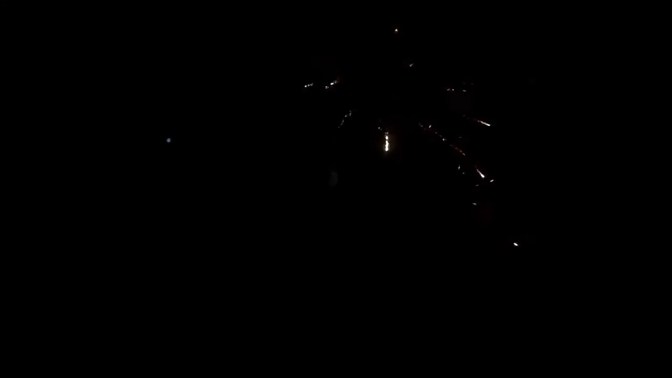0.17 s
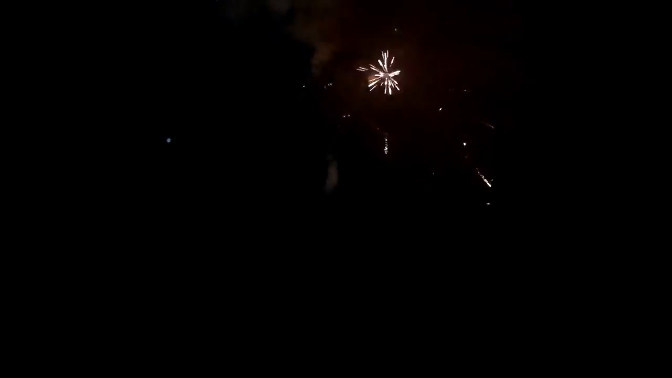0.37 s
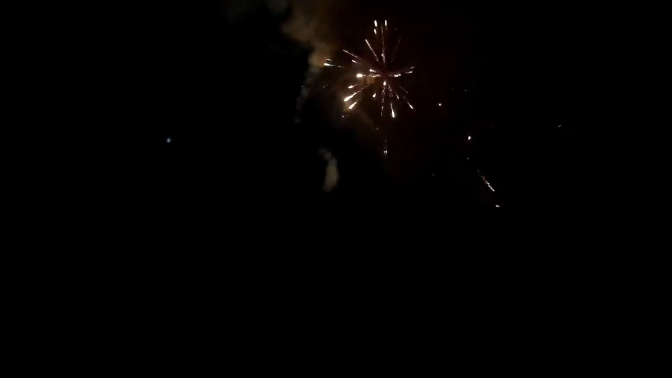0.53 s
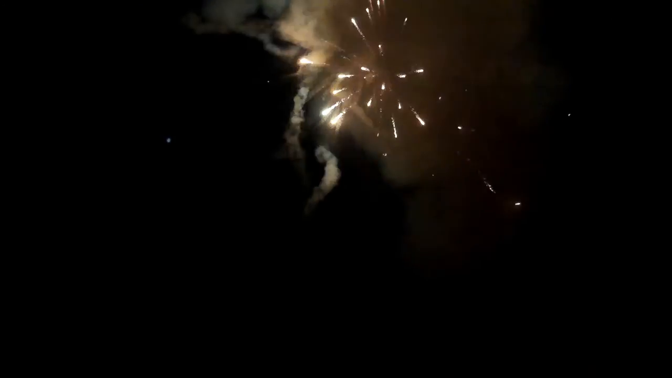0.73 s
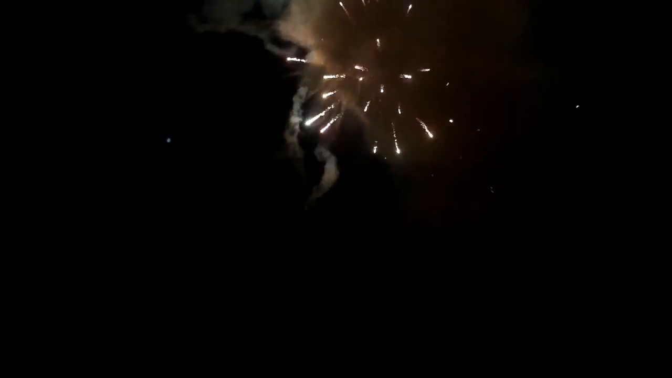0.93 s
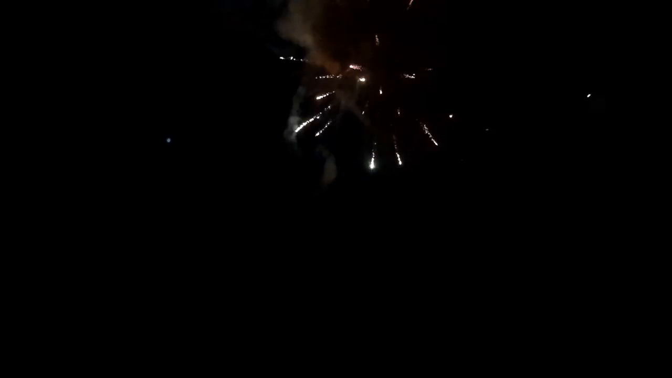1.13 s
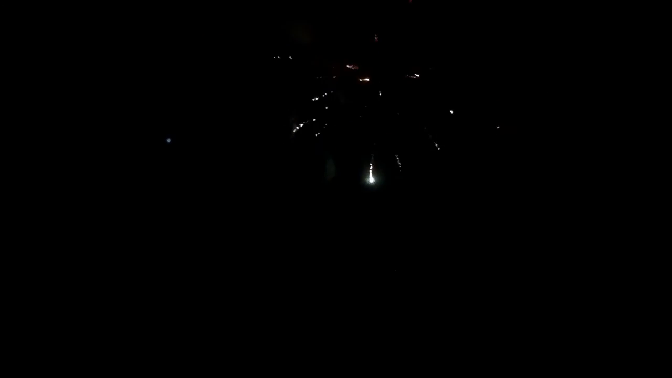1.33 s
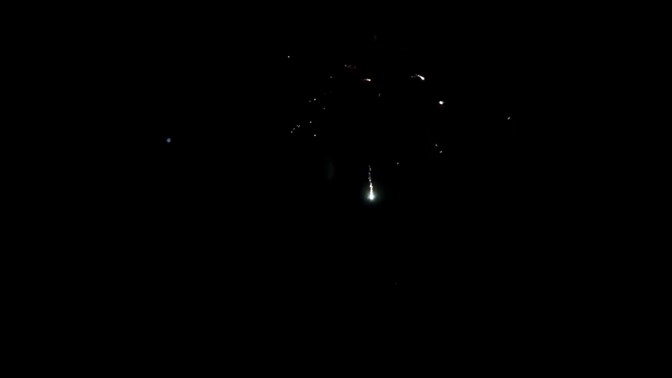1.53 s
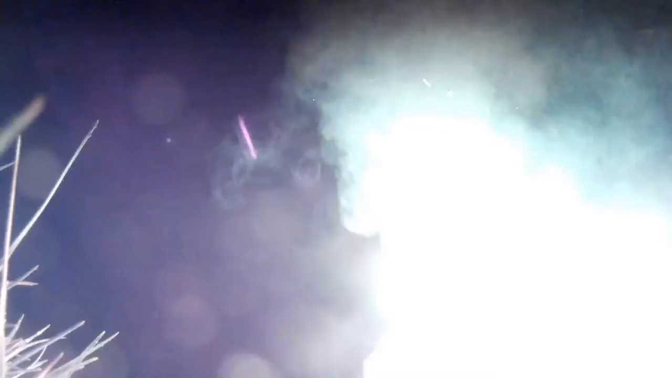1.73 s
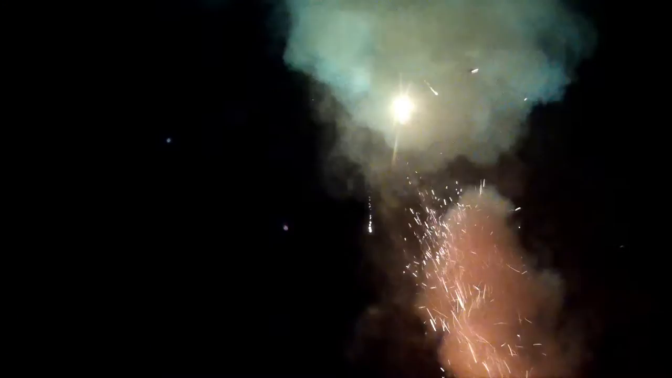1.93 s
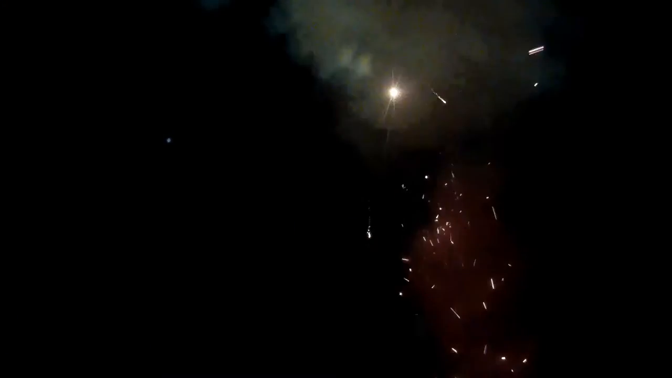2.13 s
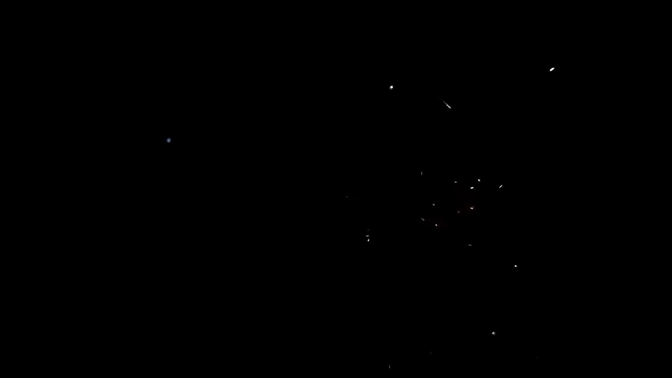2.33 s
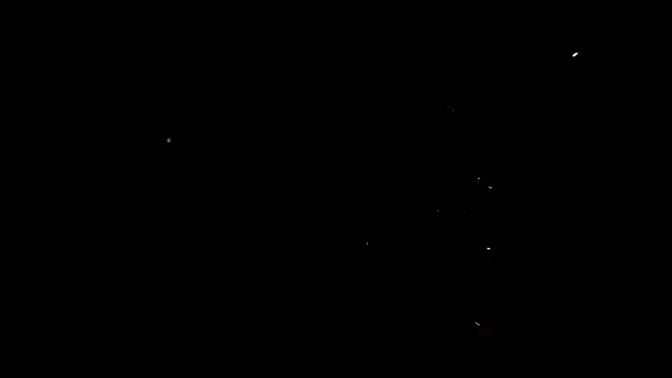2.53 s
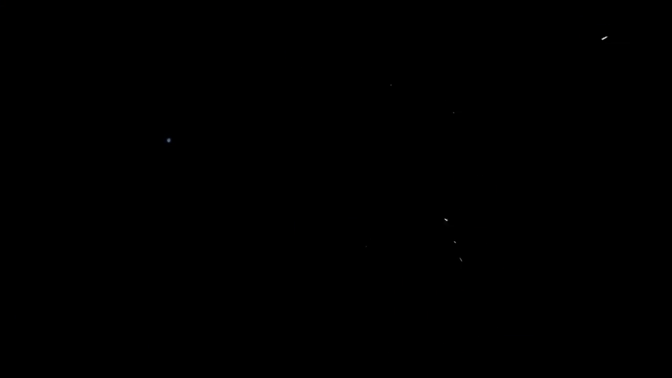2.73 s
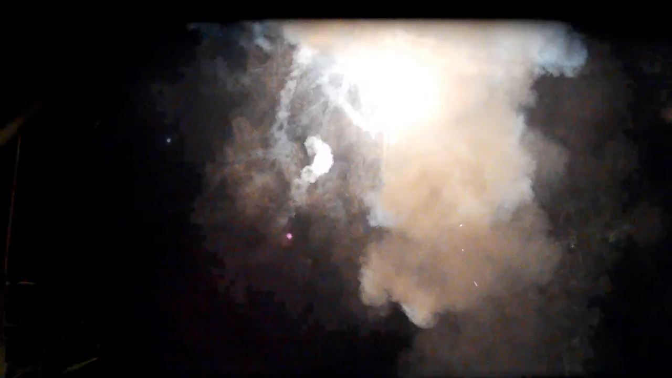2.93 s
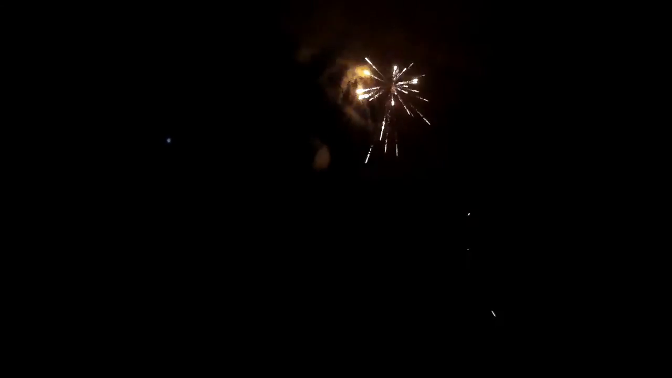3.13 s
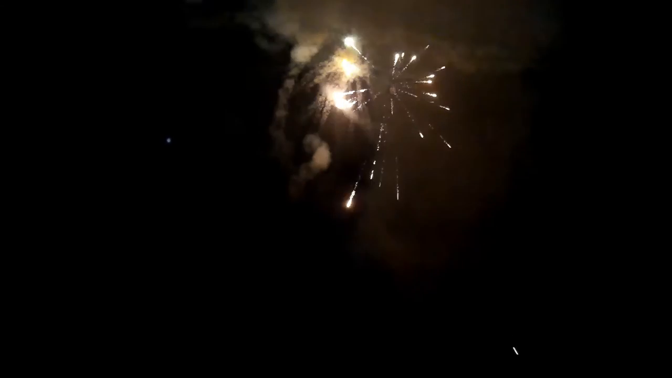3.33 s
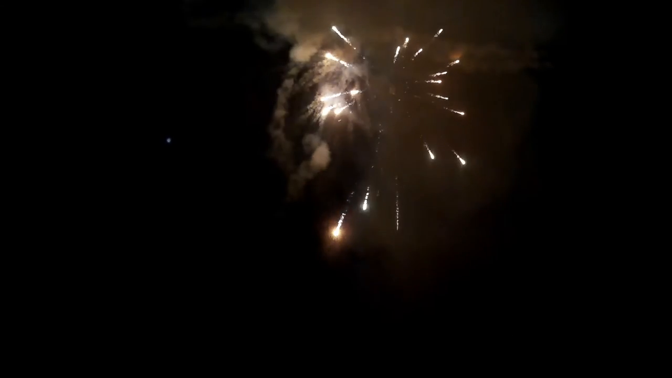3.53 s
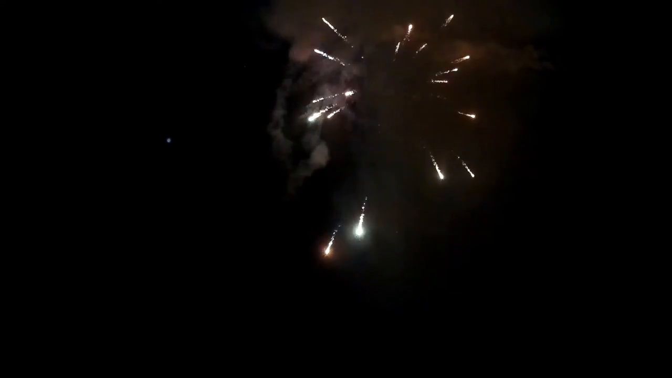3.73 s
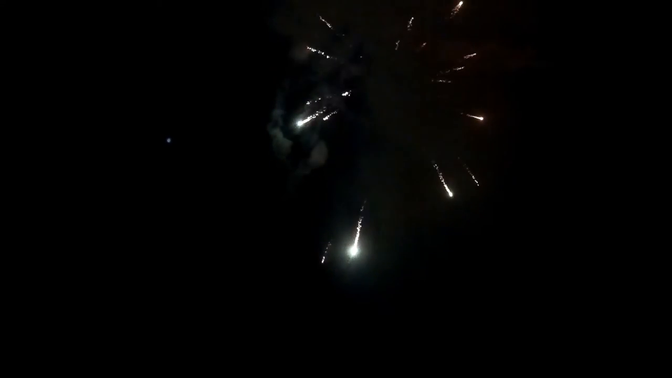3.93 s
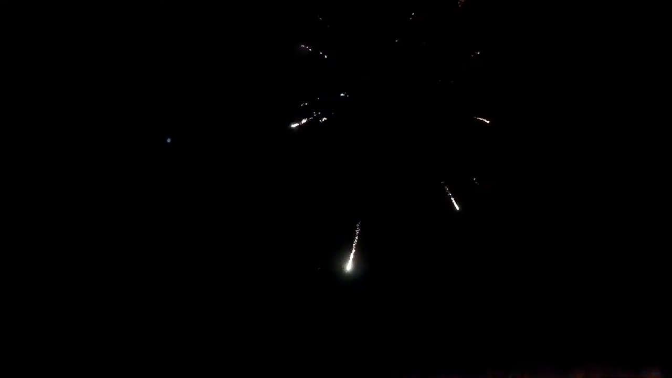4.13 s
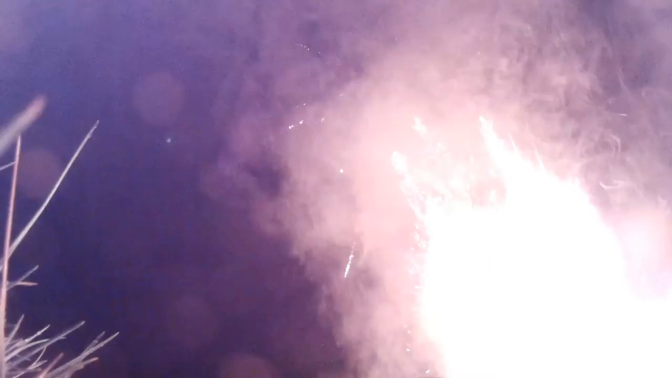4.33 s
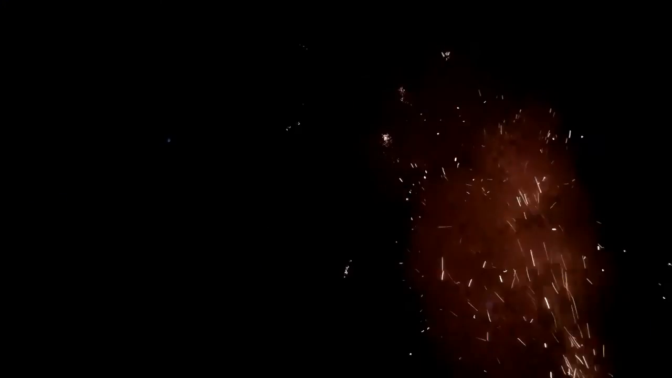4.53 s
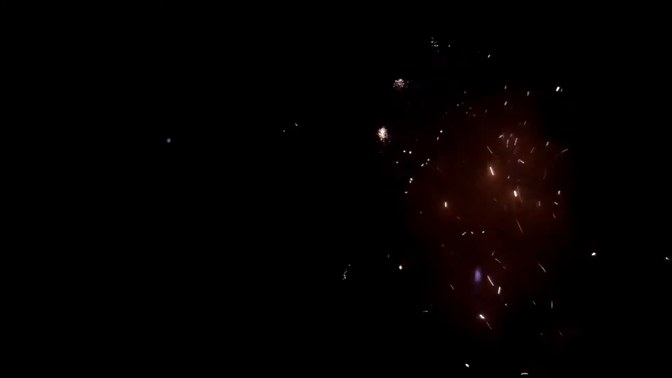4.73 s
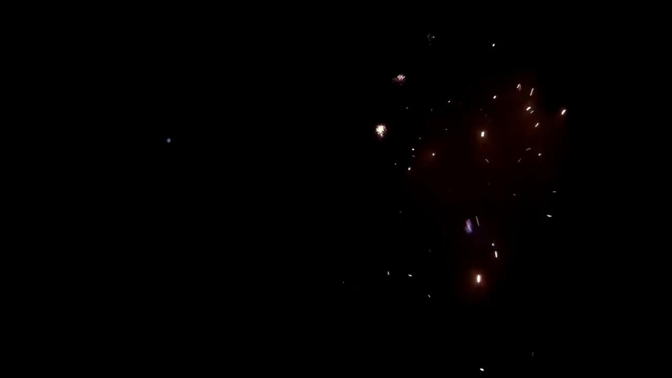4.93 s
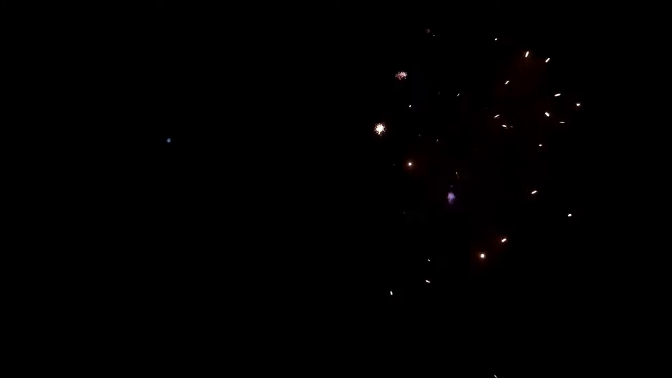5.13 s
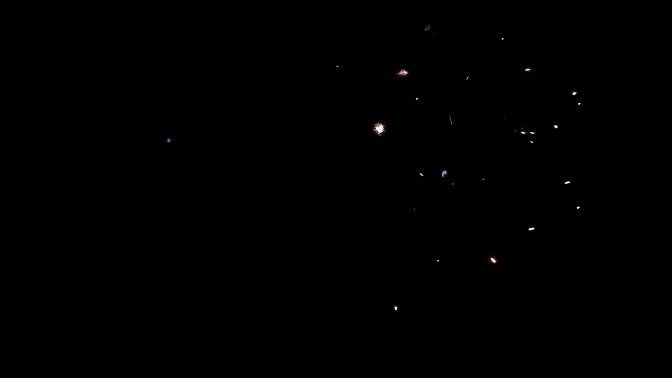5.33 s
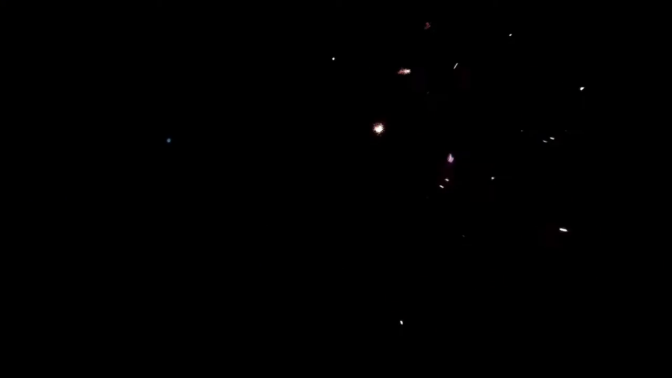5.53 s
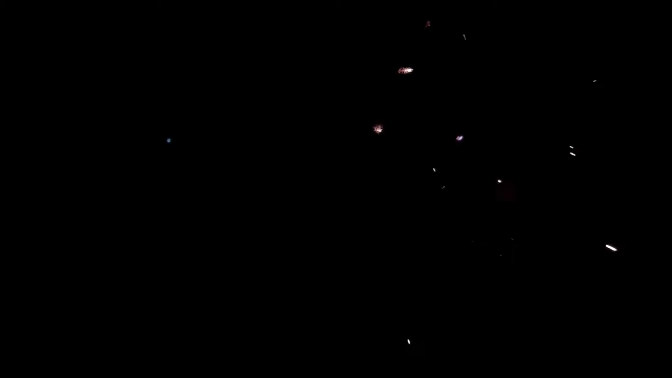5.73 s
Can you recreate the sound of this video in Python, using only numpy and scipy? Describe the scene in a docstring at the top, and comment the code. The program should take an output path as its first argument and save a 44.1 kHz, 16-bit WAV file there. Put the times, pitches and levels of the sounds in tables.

```python
"""Far thuds over a low rumble, then a firework shell cracks overhead: a garden at night.
Shells launch from tubes a few metres away and burst above. Each blast is a pressure jump and suction,
returned by hedges, trees and house walls. Spark fountains hiss briefly after the launches.
A small camera listens through a ringing housing and clips on the close bangs."""
import sys
import numpy as np
from scipy import signal
from scipy.fft import rfft, irfft
from scipy.io import wavfile
from scipy.ndimage import uniform_filter1d

SR = 44100
rng = np.random.default_rng(int(sys.argv[2]) if len(sys.argv) > 2 else 0)


def unload_wav(signal):
    """Save mono or channel-first audio to the path in sys.argv[1] as 16-bit WAV at rate SR, clipped to [-1, 1]."""
    wavfile.write(
        sys.argv[1],
        SR,
        np.round(np.clip(np.atleast_2d(signal).T, -1, 1) * 32767).astype(np.int16),
    )


N = 254898

KNOCK_HZ = 1066  # main housing resonance
BOUNCE_MS, BOUNCE_DB = 0.32, 2  # ground reflection, re direct blast
FRONT_DB = -1  # shock front bypassing the cover, re knock
SWELL_RISE_DB = 20  # climb per rise time
FAR_CYCLES, FAR_ROUGH = 2.1, 0.38
FAINT_PER_S, FAINT_MAX_DB, FAINT_HZ = 4, -51, 420
RUMBLE_DB, RUMBLE_FADE_DB_S, STEADY_DB = -51.5, 0.5, -54.5
HISS_DB, HISS_TOP_HZ = -67, 15400
CLIP, TOP_HZ = 0.705, 16900

# overhead bursts: (time [s], blast [dB], push [ms], knock [dB], ring and returns [dB], return lead [ms])
BURSTS = [(0.4142, 11.5, 0.13, -5.5, 1, 1), (3.0822, 12.5, 0.1, -9.5, -1.5, 3.51)]
# tube launches: (time [s], blast [dB], push [ms], knock [dB], metal ring [dB], scatter [dB],
# wall echo [dB], ground shake [dB], shake lead [ms])
LAUNCHES = [(1.7488, 16, 0.22, 6, -2, 1, 3, -17.5, 4.8), (1.8319, -4, 1, -38, -51, -10, -19, -50, 1.26),
            (4.1901, 12.5, 0.42, 5.5, -5, 0, -3, -20, 6.15),
            (4.2309, 13, .6, -1.5, -12.5, -10.5, -1.5, -18.5, 7),
            (4.2764, 14.5, 0.45, -15.5, -40.5, -14.5, -8.5, -21, 12)]
# foliage and ground returns:
# (delay [s], rise [s], hold [s], low [dB], treble [dB], low t60 [s], treble t60 [s])
BURST_SCATTER = [(0, .001, 0.00057, -30.5, -7, .3, 0.021), (.012, .01, .001, -49, -37, 3.5, 0.34),
                 (0.08, .03, 0.037, -37.5, -29, 0.37, 0.32),
                 (0.096, 0.0026, 0.004, -33, -23.5, 0.14, 0.057),
                 (0.235, 0.007, .06, -40.5, -39.5, 0.41, 0.46), (0.556, 0.21, 0.026, -49, -56.5, 0.42, .8)]
LAUNCH_SCATTER = [(0, .001, .001, -20.5, -21.5, 0.062, .06), (.02, .02, 0.00091, -40, -40.5, .45, .45),
                  (.33, .2, 0.0015, -59.5, -58, 2.2, 1.2)]
# wall echoes: (delay [s], level [dB], pitch [Hz], cycles)
BURST_ECHOES = [(0.0972, -14, 1490, 1.07), (.097, -36.5, 760, 7.7), (0.21, -32, 430, 2.86),
                (0.2379, -24.5, 616, 1.05), (0.2412, -22.5, 300, 3), (0.261, -32, 405, 1.44),
                (.56, -40, 700, 3.1)]
LAUNCH_ECHOES = [(0.159, -39, 462, 3.4), (0.283, -44.5, 437, 1.26), (.317, -38.5, 670, 1.56),
                 (.335, -32.5, 340, 3.5), (.39, -40, 380, 0.67)]
# modes of nearby metal, camera housing: (frequency [Hz], level [dB], t60 [s])
METAL_MODES = [(1614, -27, 0.4), (3760, -39.5, 0.27), (3880, -43.5, 0.092)]
HOUSING_MODES = [(KNOCK_HZ, 0, 0.035), (440, -7.5, 0.02), (1900, -10.5, 0.021), (2600, -10, 0.014),
                 (3700, -2, 0.0083)]
# low thump after each launch as the microphone recovers: (frequency [Hz], level re knock [dB], t60 [s])
LOW_THUMP_MODES = [(35, -15.5, 0.13), (90, -28.5, .15)]
# spark fountains; a crackling wash already fading as the scene opens, and a distant volley: # (time [s], rise
# [s], hold [s], low [dB], treble [dB], low t60 [s], treble t60 [s])
SPARKS = [(1.89, 0.036, .05, -48.5, -46, 0.68, .15), (4.29, .012, 0.026, -31.5, -30, 0.25, 0.3)]
CRACKLE_WASHES = [(.002, .001, 0.03, -54, -59, 0.84, .6), (2.46, .08, 0.013, -51, -60, 0.31, 0.44)]
# far bangs: (time [s], level [dB], pitch [Hz])
FAR_BANGS = [(0.0142, -35.5, 574), (.062, -41.5, 547), (.168, -48, 383), (0.349, -38, 830),
             (.951, -40, 3166), (1.091, -37.5, 950), (1.248, -46, 242), (1.403, -38, 2980),
             (1.411, -40.5, 236), (2.245, -49.5, 398), (2.489, -44, 299), (2.571, -46, 283),
             (2.986, -49.5, 455), (3.954, -47, 393), (4.031, -43, 918), (4.121, -46, 383),
             (4.475, -43, 272), (4.707, -50, 300), (5.019, -47, 159), (5.098, -51.5, 501),
             (5.221, -42.5, 149), (5.556, -55, 149.1)]
# rumble spectrum, housing response: (frequency [Hz], gain [dB])
RUMBLE_SPECTRUM = [(20, 3.5), (60, 7.5), (200, -3.5), (450, -7), (900, -14), (2000, -25.5), (4000, -21),
                   (16000, -45)]
HOUSING_RESPONSE = [(20, -18.5), (100, -4.5), (400, 1.5), (780, -2.5), (1300, -7.5), (2100, -4.5),
                    (2550, -17.5), (3900, -25.5), (5000, -28.5), (6700, -35.5), (10000, -34),
                    (17000, -47.5)]
# housing cavity and cover slot resonances: (centre [Hz], width [Hz], boost [dB])
CAVITY_PEAKS = [(KNOCK_HZ, 120, 12.85), (1790, 340, 0.67)]
SLOT_PEAKS = [(3150, 600, 11), (4500, 300, 6), (5650, 600, 16), (8100, 1200, 4)]


def bursts():
    """Overhead shells: blast, ground bounce, ringing, returns. Gives (airborne, housing-borne)."""
    air, body = np.zeros((2, N))
    for s, db, push_ms, knock_db, wet_db, lead_ms in BURSTS:
        add(air, s, undb(db) * blast(push_ms))
        add(air, s + BOUNCE_MS / 1000, undb(db + BOUNCE_DB) * blast(3.57 * push_ms))
        add(air, s, ring(METAL_MODES, wet_db))
        add(body, s + 0.00054, ring(HOUSING_MODES[2:], knock_db))  # only small panels struck from above
        foliage = [(max(delay_s - lead_ms / 1000, 0), *rest) for delay_s, *rest in BURST_SCATTER]
        add(air, s + 0.001, scatter(foliage, wet_db))
        for delay_s, echo_db, hz, cycles in BURST_ECHOES:
            add(air, s + delay_s - lead_ms / 1000, thud(echo_db + wet_db, hz, cycles))
    return air, body


def launches():
    """Tube shots: ground kick first, then blast, ringing, returns. Gives (airborne, housing-borne)."""
    air, body = np.zeros((2, N))
    for s, db, push_ms, knock_db, metal_db, wet_db, wall_db, shake_db, lead_ms in LAUNCHES:
        add(body, s - lead_ms / 1000, undb(shake_db) * ground_rattle(lead_ms))
        add(air, s, undb(db) * blast(push_ms))
        add(body, s, undb(knock_db + FRONT_DB) * blast(push_ms, rise_ms=0.014))
        add(body, s + 0.0001, ring(HOUSING_MODES, knock_db))
        add(air, s, ring(METAL_MODES, metal_db) + ring(LOW_THUMP_MODES, knock_db))
        add(air, s + 0.00087, scatter(LAUNCH_SCATTER, wet_db))
        for delay_s, echo_db, hz, cycles in LAUNCH_ECHOES:
            add(air, s + delay_s, thud(echo_db + wall_db, hz, cycles, rough=0.27))
    return air, body


def blast(push_ms, rise_ms=0.062, suction=0.76):
    """Pressure jumps, crosses zero at push_ms, sucks back."""
    t_ms = np.arange(SR // 50) / SR * 1000
    return (1 - np.exp(-t_ms / rise_ms)) * (1 - t_ms / push_ms) * np.exp(-t_ms / push_ms / suction)


def ground_rattle(lead_ms):
    """The ground wave rattles the housing until the air blast arrives."""
    t_ms = np.arange(SR // 20) / SR * 1000
    noise = band(band(rng.standard_normal(len(t_ms)), 900, 2000), 520, 3000)
    rattle = np.sin(2 * np.pi * KNOCK_HZ * t_ms / 1000) + 0.5 * unit(noise)
    onset = np.minimum(2 * t_ms / lead_ms, 1) ** 0.16
    return rattle * onset * (t_ms < lead_ms)


def ring(modes, db):
    """Struck object: one decaying sine per mode."""
    t = np.arange(SR // 2) / SR
    return sum(undb(db + mode_db) * np.sin(2 * np.pi * hz * t) * np.exp(-np.log(1000) * t / t60_s)
               for hz, mode_db, t60_s in modes)


def scatter(rows, db, grain_db=2.1):
    """Dense small arrivals of uneven size; lows and treble decay separately."""
    delay_s, rise_s, hold_s, low_db, treble_db, low_t60_s, treble_t60_s = np.transpose(rows)
    t = np.arange(3 * SR // 2) / SR
    sizes = rng.exponential(size=(2, len(t) // 50)).repeat(50, axis=1)
    grains = rng.standard_normal((2, len(t))) * undb(grain_db * sizes)
    low = unit(band(grains[0], 100, 1300))
    treble = unit(band(grains[1], 1600, 11000))
    low *= swell(t, zip(delay_s, rise_s, hold_s, low_db, low_t60_s))
    treble *= swell(t, zip(delay_s, rise_s, hold_s, treble_db, treble_t60_s))
    return undb(db) * (low + treble)


def swell(t, rows):
    """Power sum of envelopes that climb, hold and decay linearly in dB."""
    power = 0
    for peak_s, rise_s, hold_s, db, t60_s in rows:
        onset_db = SWELL_RISE_DB * np.maximum(peak_s - t, 0) / rise_s
        decay_db = 60 * np.maximum(t - peak_s - hold_s, 0) / t60_s
        power += undb(db - onset_db - decay_db) ** 2
    return np.sqrt(power)


def thud(db, hz, cycles, rough=0.49):
    """Dull echo or far bang: a few cycles smeared by a noise tail."""
    progress = np.arange(SR // 10) / SR * hz / cycles
    noise = unit(band(rng.standard_normal(SR // 10), 0.48 * hz, 2.3 * hz))
    pulse = np.sin(np.pi * np.minimum(progress, 1)) ** 0.85 * np.sin(2 * np.pi * cycles * progress)
    tail = noise * np.exp(-progress / 1.4) * (1 - np.exp(-progress / 0.066))
    return undb(db) * (pulse + rough * tail)


def crackle(rows):
    """Sparks or other washes of crackle: one wash of tiny pops per row."""
    out = np.zeros(N)
    for s, rise_s, *rest in rows:
        add(out, s - 2 * rise_s, scatter([(2 * rise_s, rise_s, *rest)], 0))
    return out


def far_bangs():
    """Distant fireworks: timed thuds plus fainter random ones."""
    out = np.zeros(N)
    for s, db, hz in FAR_BANGS:
        add(out, s, thud(db, hz, FAR_CYCLES, FAR_ROUGH))
    for when, faintness, pitch in rng.random((int(FAINT_PER_S * N / SR), 3)):
        db, hz = FAINT_MAX_DB - 4 * faintness, FAINT_HZ * 2 ** (pitch - 0.5)
        add(out, when * N / SR, thud(db, hz, FAR_CYCLES, FAR_ROUGH))
    return out


def rumble():
    """Town and distant fireworks: two flickering, slowly fading bands over steady bass."""
    hz, t = np.fft.rfftfreq(N, 1 / SR), np.arange(N) / SR
    noise = unit(irfft(rfft(rng.standard_normal(N)) * colour(RUMBLE_SPECTRUM, hz), N))
    drift_db = 2.2 * walk(9)
    lows = band(noise, 72, 600) * undb(drift_db + 1.1 * walk(86))
    highs = band(noise, 380, 15000) * undb(drift_db + walk(28))
    bass = undb(STEADY_DB) * band(noise, 13, 110)
    return (lows + highs) * undb(RUMBLE_DB - RUMBLE_FADE_DB_S * t) + bass


def housing():
    """Impulse response of the microphone behind its resonant cover."""
    size = 2 ** 14
    hz = np.fft.rfftfreq(size, 1 / SR)
    peaks = sum(undb(db) / np.hypot(1, 2 * (hz - centre_hz) / width_hz) ** 2
                for centre_hz, width_hz, db in CAVITY_PEAKS + SLOT_PEAKS)
    gain = colour(HOUSING_RESPONSE, hz) * (1 + peaks)
    cepstrum = irfft(np.log(gain), size)
    cepstrum[1:size // 2] *= 2  # fold to minimum phase
    cepstrum[size // 2 + 1:] = 0
    return irfft(np.exp(rfft(cepstrum)), size)[:size // 2]


def undb(db):
    """dB to gain."""
    return 10 ** (np.asarray(db) / 20)


def unit(x):
    """Scale to rms 1."""
    return x / np.sqrt(np.mean(x ** 2))


def colour(points, hz):
    """Gain at hz from (Hz, dB) points on a log axis."""
    point_hz, db = np.transpose(points)
    return undb(np.interp(np.log(hz + 1), np.log(point_hz), db))


def band(x, lo_hz, hi_hz):
    """Gentle band-pass."""
    return signal.sosfilt(signal.butter(2, [lo_hz, hi_hz], "band", fs=SR, output="sos"), x)


def add(out, s, x):
    """Mix x into out from time s."""
    i = int(round(s * SR))
    out[i:i + len(x)] += x[:N - i]


def walk(rate_hz):
    """Random steps, smoothed twice."""
    hold = int(SR / rate_hz)
    steps = np.repeat(rng.standard_normal(N // hold + 1), hold)
    return uniform_filter1d(uniform_filter1d(steps, hold), hold)[:N]


def scene():
    """Airborne sound passes the cover; knocks reach the capsule through the body."""
    launch_air, launch_body = launches()
    sparks = crackle(SPARKS)
    burst_air, burst_body = bursts()
    background = rumble() + crackle(CRACKLE_WASHES) + far_bangs()
    air = signal.fftconvolve(launch_air + sparks + burst_air + background, housing())[:N]
    return (air + launch_body + burst_body)[None]


def record(dry):
    """Preamp hiss, hard clip, low-pass."""
    hiss_filter = signal.ellip(8, 0.2, 60, HISS_TOP_HZ, fs=SR, output="sos")
    hiss = undb(HISS_DB) * signal.sosfilt(hiss_filter, rng.standard_normal(N))
    clipped = np.clip(dry + hiss, -CLIP, CLIP)
    return signal.sosfilt(signal.ellip(8, 0.2, 70, TOP_HZ, fs=SR, output="sos"), clipped)


dry = scene()
out = record(dry)
unload_wav(out)
```